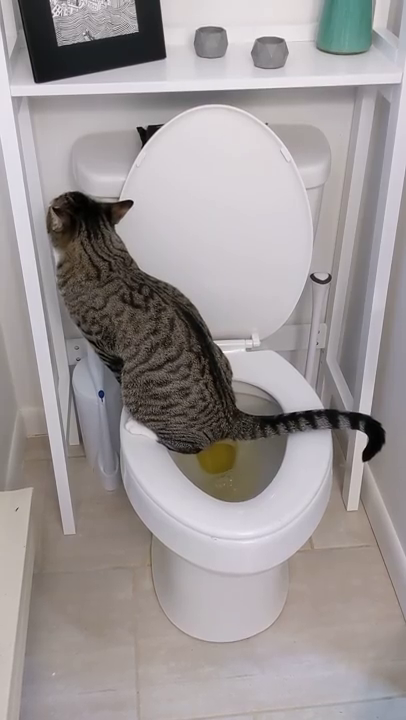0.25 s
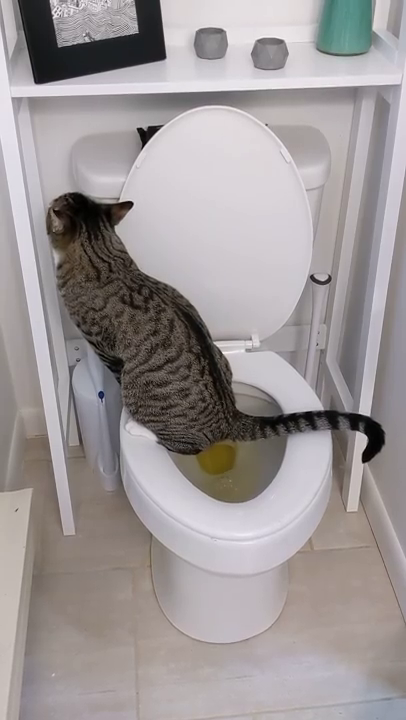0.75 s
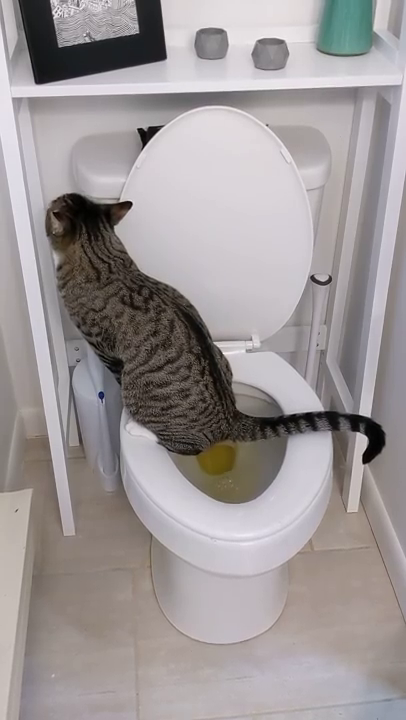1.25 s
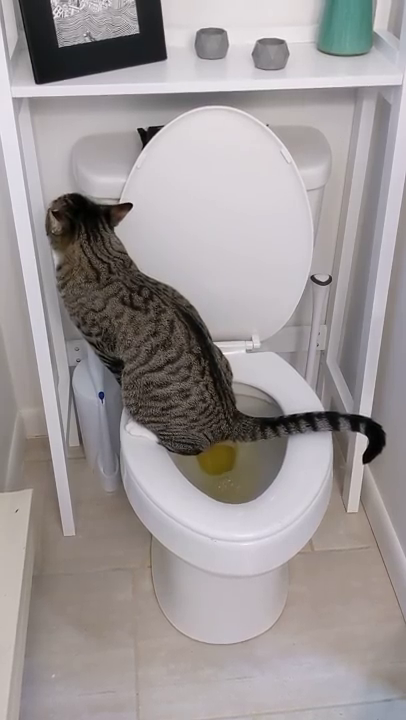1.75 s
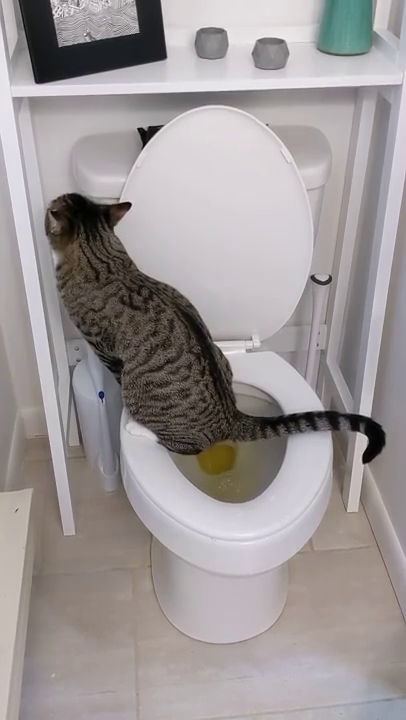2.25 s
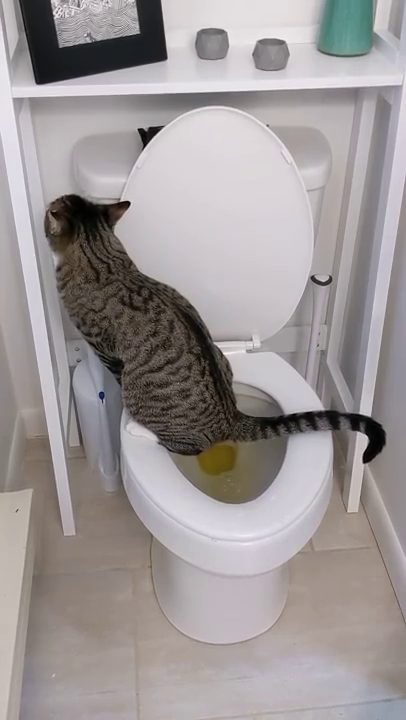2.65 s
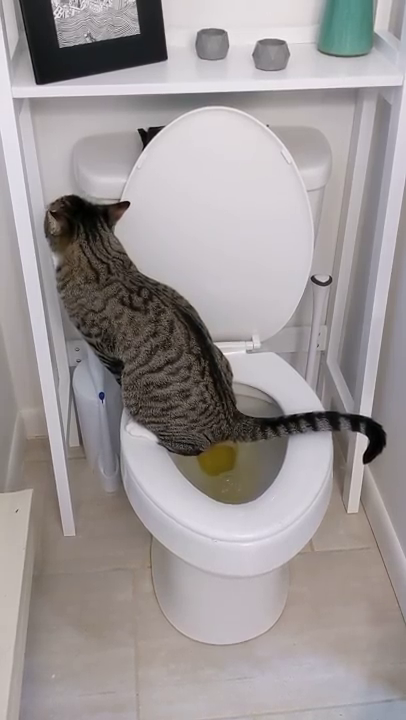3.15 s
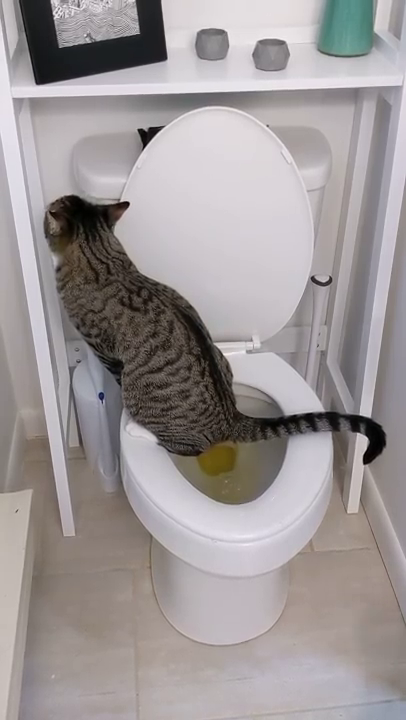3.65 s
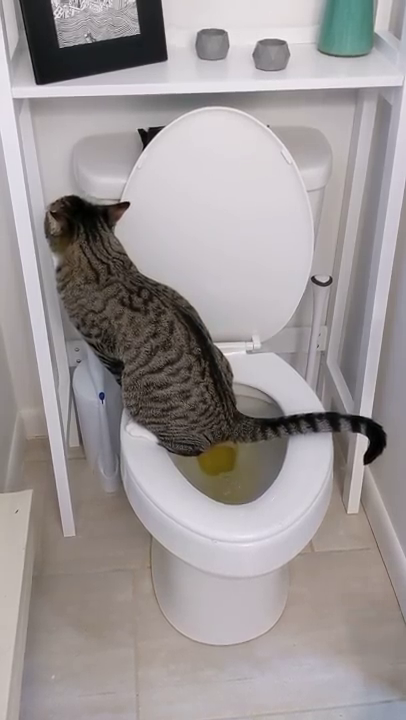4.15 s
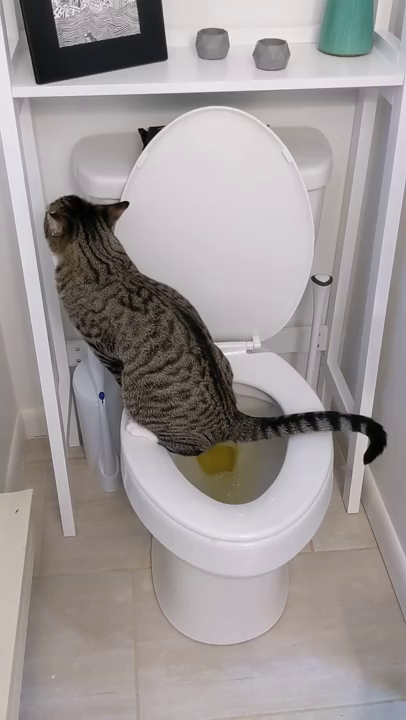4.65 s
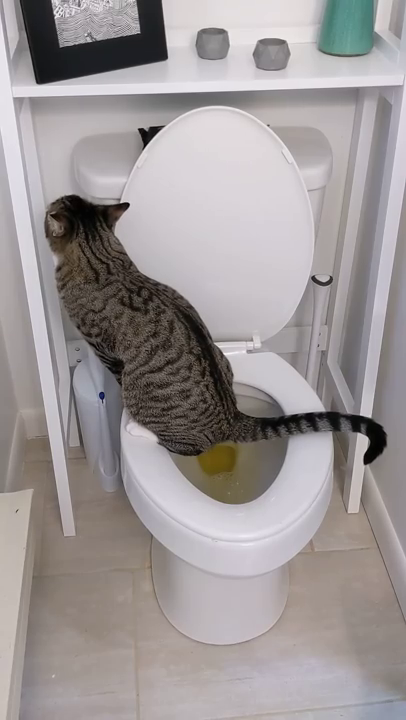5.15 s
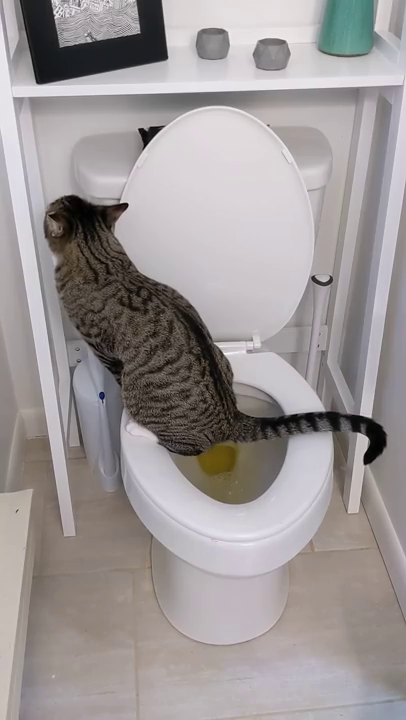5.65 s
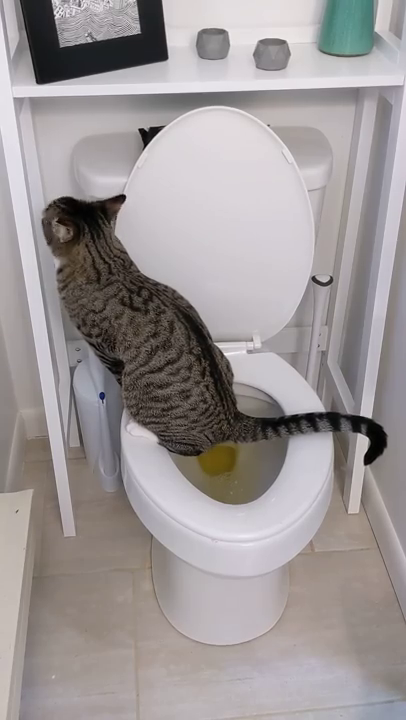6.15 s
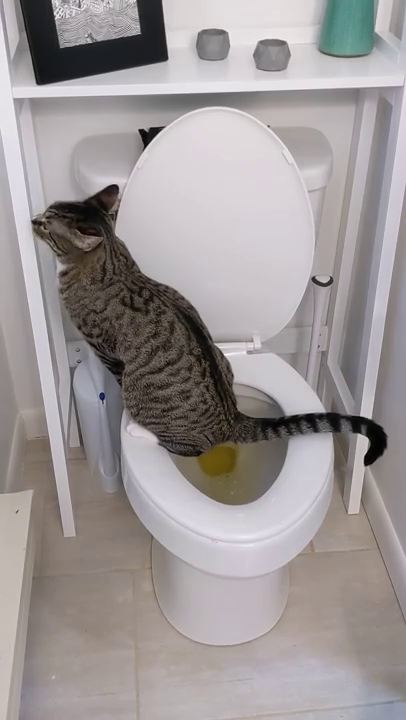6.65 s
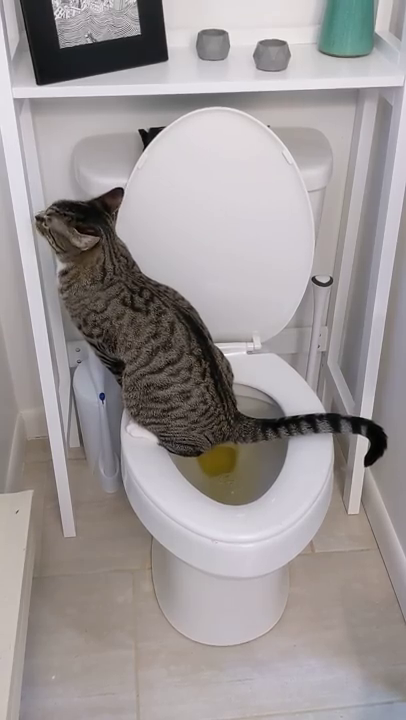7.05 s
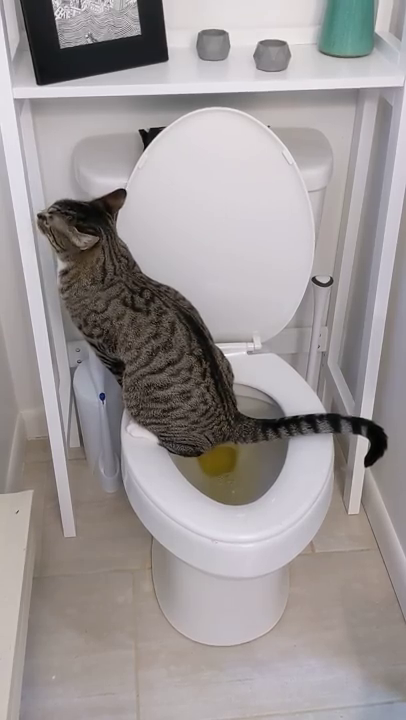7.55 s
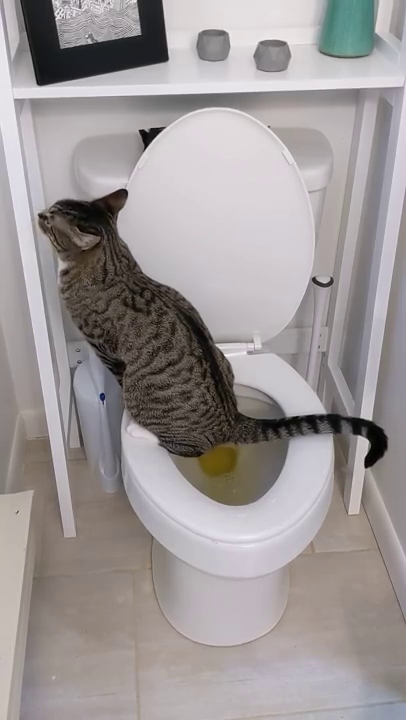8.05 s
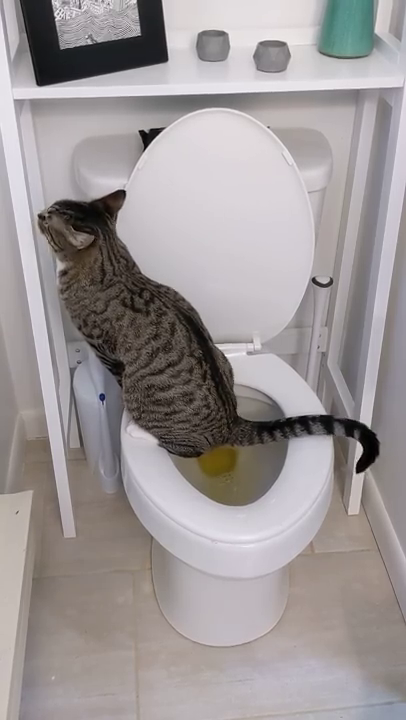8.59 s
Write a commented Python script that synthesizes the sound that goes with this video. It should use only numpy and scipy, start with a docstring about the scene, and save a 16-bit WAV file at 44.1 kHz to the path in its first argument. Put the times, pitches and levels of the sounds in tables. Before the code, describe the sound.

From the start, a cat's thin stream trickles into toilet water, a mix of small gurgles, fine spray and bright plinks. It is heard from nearby, and the bowl and hard bathroom walls give each drop a short ringing tail. The flow runs almost steadily, with brief dips at about 2.6 and 4.1 seconds. At about 4.4 seconds, one soft, low thud comes from somewhere in the house. The stream breaks off around 5.5 seconds, then returns at 6 seconds as short, weaker, slightly higher spurts with scattered drips between them. A last little spurt and a sharp plink come at about 8.3 seconds, and the water stops. Faint, steady air noise and a low, wavering ventilation hum lie underneath throughout and remain alone until the end, near 9 seconds.

```python
"""A small hard-walled bathroom: a cat's thin stream falls into the toilet water, breaks up and stops.
Each drop traps bubbles that ring briefly; large ones gurgle, smaller ones crowd above them in spurts.
Bowl and walls draw every plink out into a tail. Behind it are steady air noise, a low ventilation hum
that wavers in the room's bass modes, and one dull thud from the house."""
import sys
import numpy as np
from scipy import signal
from scipy.fft import rfft, irfft
from scipy.io import wavfile
from scipy.ndimage import uniform_filter1d

SR = 44100
rng = np.random.default_rng(int(sys.argv[2]) if len(sys.argv) > 2 else 0)


def bounce(signal):
    """Save signal as a 16-bit WAV file at the path given by the first command-line argument."""
    frames = np.transpose(np.atleast_2d(signal))
    limited = np.clip(frames, -1, 1)
    pcm = np.round(limited * 32767).astype(np.int16)
    wavfile.write(sys.argv[1], SR, pcm)


N = 389016

# Spurts of the stream. Each row: start and end in seconds, relative levels of gurgle, mid-sized bubbles
# and fine spray in dB, gurgle pitch at start and at end in Hz.
SPURTS = [(-0.1, 0.707, -59.5, -57.5, -56, 1178, 1230), (0.717, 1.748, -55.5, -58, -56, 1217, 1180),
          (1.756, 2.583, -58, -58, -56, 1273, 1260), (2.77, 3.67, -63.5, -57.5, -58, 1323, 1330),
          (3.662, 4.042, -59, -56.5, -57, 1374, 1510), (4.219, 4.7, -56.5, -57, -60, 1305, 1600),
          (4.754, 5.232, -63, -58.5, -60, 1245, 1450), (5.27, 5.44, -91, -63, -53.5, 1300, 920),
          (5.986, 6.12, -66, -69, -68.5, 2280, 2200), (6.148, 6.542, -66, -60.5, -60.5, 1750, 1770),
          (6.536, 6.772, -69, -59, -59.5, 1380, 1650), (7.005, 7.275, -55.5, -63.5, -66.5, 2550, 1840),
          (7.342, 7.52, -73, -82, -63, 1920, 1500), (7.66, 7.877, -72, -75.5, -64.5, 2180, 3900),
          (7.973, 8.26, -62, -64, -67.5, 1520, 2600), (8.25, 8.31, -69, -59, -51.5, 2200, 1600)]


def amp(db):
    """dB to gain."""
    return 10 ** (np.asarray(db) / 20)


def unit_rms(x):
    """Scale to rms 1."""
    return x / np.sqrt(np.mean(x ** 2) + 1e-20)


def at_hz(points, hz):
    """Read a (Hz, value) table on a log axis."""
    knots_hz, values = np.transpose(points)
    return np.interp(np.log(np.maximum(hz, 1)), np.log(knots_hz), values)


def resonance(hz, centre_hz, width_hz):
    """Bell curve of height 1."""
    return 1 / (1 + (2 * (hz - centre_hz) / width_hz) ** 2)


def stereo_noise(gain_at):
    """Noise of rms 1 shaped by gain_at(hz); the channels are alike in the bass."""
    # Each row: frequency in Hz, left-right correlation.
    correlation = [(60, 0.88), (200, 0.99), (380, 0.68), (700, 0.41), (1300, 0.18), (16000, .01)]
    hz = np.fft.rfftfreq(N, 1 / SR)
    mid, side = rfft(rng.standard_normal((2, N)))
    alike = at_hz(correlation, hz)
    spectrum = np.sqrt(1 + alike) * mid + np.sqrt(1 - alike) * side * [[1], [-1]]
    return unit_rms(irfft(spectrum * gain_at(hz), N))


def air(rms_db=-65):
    """Steady air noise, strongest in the bass."""
    # Each row: frequency in Hz, relative density in dB.
    spectrum = [(30, -35), (45, -24), (80, -19), (215, -18), (340, -20), (512, -25.5), (780, -25),
                (900, -31), (2200, -30), (5900, -34), (8080, -37), (10500, -33.5), (13700, -39),
                (16000, -32)]
    return amp(rms_db) * stereo_noise(lambda hz: amp(at_hz(spectrum, hz)))


def ventilation_hum():
    """Rumble picked out by the room's lowest modes, so each tone wavers."""
    # Each row: centre in Hz, width in Hz, rms level in dB.
    modes = [(60.4, 17, -71.5), (142.8, 20, -61), (172, 45, -65.5), (208.3, 13.2, -65), (769, 13, -84.5)]
    return sum(amp(db) * stereo_noise(lambda hz: resonance(hz, centre_hz, width_hz))
               for centre_hz, width_hz, db in modes)


def thud(start_s=4.42, hz=57, t60_s=0.3, rise_s=0.018):
    """A soft blow in the house: slow rise, one low ring."""
    t = np.maximum(np.arange(N) / SR - start_s, 0)
    envelope = amp(-36 - 60 * t / t60_s) * (1 - np.exp(-t / rise_s))
    return envelope * np.sin(2 * np.pi * hz * t)


def bathroom_response(early_db=11, early_s=0.035):
    """Direct sound, dense echoes that die band by band, and the air modes of bowl and room."""
    # Each row: frequency in Hz, echo t60 in seconds.
    tail_t60 = [(900, 0.53), (2400, 0.36), (6300, 0.26), (16000, 0.36)]
    # Each row: frequency in Hz, relative left and right levels in dB, right phase lead in radians.
    modes = [(1043, -5, 15.5, -3), (1105, -8, 14, 0.7), (1207, 2, 11, -0.5), (1213.6, 8, 0.5, 0.4),
             (1326, 8, 14, -2), (1336, 14, 9.5, 0.4), (1358, 1, 14, -0.9), (1440, 1, 11, -4),
             (1642, -16.5, 6.5, -2.1), (1676, -19, 12.5, -0.47), (1748, 0, 18, 0), (1797, 7, 10, -7),
             (2350, 10, 5, 4.5), (2480, 12, 9.5, 8.5), (3570, 22.5, -10, 1), (4140, 23, -9, -9)]
    mode_t60 = [(1100, 0.21), (3500, 0.06)]   # Hz, s
    t = np.arange(SR // 2) / SR
    hz = np.fft.rfftfreq(len(t), 1 / SR)
    noise = rfft(rng.standard_normal((2, len(t))))
    edges_hz = 500 * 2 ** np.arange(0, 6, 0.5)
    response = 0
    for low, high in zip(edges_hz, edges_hz[1:]):
        band = irfft(noise * ((hz >= low) & (hz < high)))
        response += band * amp(-60 * t / at_hz(tail_t60, np.sqrt(low * high)))
    response *= amp(early_db * np.exp(-t / early_s))   # the bowl's echoes come first and fade fast
    for mode_hz, left_db, right_db, lead_rad in modes:
        envelope = amp([[left_db], [right_db]]) * amp(-19.5 - 60 * t / at_hz(mode_t60, mode_hz))
        response += envelope * np.sin(2 * np.pi * mode_hz * t + [[0], [lead_rad]])
    response *= 1 - np.exp(-t / 99e-6)
    response[[0, 1], [0, 2]] += amp(26.5)   # direct sound, 2 samples later on the right
    return response


def place(start_s, sounds, level_db):
    """Mix one sound per row at its start time, with its energy set to its level."""
    gain = amp(level_db) / np.sqrt(np.sum(sounds ** 2, axis=1))
    index = np.round(start_s * SR).astype(int)[:, None] + np.arange(sounds.shape[1])
    return np.bincount(index.ravel(), (sounds * gain[:, None]).ravel(), N)[:N]


def bubbles(start_s, hz, level_db, rise_per_cycle=0.0023, attack_cycles=3.5):
    """Each bubble is a dying sine that rises in pitch as it nears the surface."""
    # Each row: pitch in Hz, cycles to fall by 60 dB.
    decay = [(1200, 48), (2200, 30), (3500, 24), (8000, 24), (15000, 22)]
    life_cycles = at_hz(decay, hz)
    t = np.arange(int(0.7 * SR * np.max(life_cycles / hz))) / SR
    cycles = hz[:, None] * t
    envelope = (1 - np.exp(-cycles / attack_cycles)) * amp(-60 * cycles / life_cycles[:, None])
    ring = np.sin(2 * np.pi * (cycles + rise_per_cycle * cycles ** 2 / 2))
    return place(start_s, envelope * ring, level_db)


def spurt_gains(t, attack_s=0.03, release_s=0.013):
    """One row per spurt: the flow swells, holds and dies away."""
    start_s, end_s = np.transpose(SPURTS)[:2, :, None]
    return np.clip((t - start_s) / attack_s, 0, 1) * np.exp(-np.maximum(t - end_s, 0) / release_s)


def bubble_crowd(surge_sound, clumps_per_s=26, clump_s=0.012, clumped_share=0.6):
    """Mid-sized bubbles and fine spray, partly landing in clumps; spurts and surges set their level."""
    # Each row: lowest and highest pitch in Hz, bubbles per second.
    sizes = [(1445, 3890, 260), (3657, 16670, 380)]
    low_skews, swell_shares = (1.4, 1.01), (0.23, 0.16)   # mid-sized, spray
    clump_count = int(clumps_per_s * N / SR)
    clump_times_s = (np.arange(clump_count) + rng.random(clump_count)) / clumps_per_s
    fast_power, slow_power = (uniform_filter1d(surge_sound ** 2, int(window_s * SR)) + 1e-9
                              for window_s in (0.089, 1 / 3))
    swell_db = np.clip(10 * np.log10(fast_power / slow_power), -12, 12)
    flow = spurt_gains(np.arange(N) / SR)
    levels_db = np.transpose(SPURTS)[3:5]
    crowd = 0
    for (low_hz, high_hz, per_s), db, skew, share in zip(sizes, levels_db, low_skews, swell_shares):
        position, lag, pitch, strength, choice = rng.random((5, int(per_s * N / SR)))
        in_clump_s = clump_times_s[(position * clump_count).astype(int)] - clump_s * np.log(lag)
        start_s = np.where(choice < clumped_share, in_clump_s, position * N / SR)
        hz = low_hz * (high_hz / low_hz) ** pitch ** skew
        strength_db = np.minimum(-2.5 * np.log(strength), 6)   # mostly faint, a few strong
        crowd += unit_rms(bubbles(start_s, hz, strength_db)) * (amp(db) @ flow) * amp(share * swell_db)
    return crowd


def gurgle(per_s=70, pitch_spread=0.042, wander_per_s=14, wander_share=0.08, glug_db=5):
    """A close chain of large bubbles, in glugs; the pitch glides through each spurt and drifts."""
    count = int(per_s * N / SR)
    order = np.arange(count)
    jitter, detune, strength, drift, glug = rng.standard_normal((5, count))
    t = np.maximum((order + 0.4 * jitter) / per_s, 0)
    drift, glug = (np.interp(t * wander_per_s, order, knots) for knots in (drift, glug))
    gains = spurt_gains(t) * amp(np.transpose(SPURTS)[2])[:, None] + 1e-9
    start_s, end_s, *_, first_hz, last_hz = np.array(SPURTS)[gains.argmax(axis=0)].T
    hz = first_hz + (last_hz - first_hz) * np.clip((t - start_s) / (end_s - start_s), 0, 1)
    hz *= (1 + wander_share * drift.clip(-1.2, 2)) * (1 + pitch_spread * detune.clip(-1.5, 2.5))
    level_db = 20 * np.log10(gains.sum(axis=0)) + 2.05 * strength + glug_db * glug
    return bubbles(t, hz, level_db) * np.sqrt(SR / per_s)   # mean level to energy per bubble


def surges(gap_s=0.014, step_db=6, pitch_spread=0.042, satellite_db=-7.5):
    """Runs of four large bubbles that swell to the second and fade; each sheds a smaller one."""
    # Each row: start in seconds, relative level in dB, pitch in Hz.
    runs = [(0.0, -48.5, 1242), (0.159, -53, 1079), (0.428, -44, 1320), (0.52, -51, 1195), (0.8, -53, 1610),
            (0.871, -54.5, 1030), (0.941, -63, 1250), (1.088, -50, 1340), (1.159, -46, 1270),
            (1.238, -43.5, 1162), (1.27, -52.5, 1710), (1.297, -47, 1113), (1.448, -50, 1302),
            (1.5, -48, 1333), (1.59, -55, 1277), (1.897, -45.5, 1428), (2.089, -52.5, 2340),
            (2.109, -57, 1260), (2.18, -52, 1050), (2.225, -46, 1395), (2.485, -51, 1333),
            (2.54, -48.5, 2260), (2.589, -55.5, 1092), (2.92, -49, 1554), (3.501, -51, 1312),
            (3.8, -54, 1345), (3.88, -47.5, 1363), (3.957, -50, 1680), (4.039, -47.5, 1161),
            (4.239, -52, 1600), (4.42, -46, 1285), (4.541, -54.5, 1350), (4.827, -47, 1556),
            (4.738, -58, 1236), (4.886, -60, 1340), (4.922, -56.5, 1100), (5.025, -43.5, 1677),
            (5.117, -50.5, 1330), (5.223, -48, 1265), (5.45, -51, 1173), (6.03, -56.5, 2260),
            (6.092, -51.5, 1860), (6.219, -54.5, 1610), (6.349, -49, 1870), (6.39, -62, 1460),
            (6.708, -53.5, 1520), (7.101, -52.5, 2030), (7.46, -55, 1135), (7.75, -53.5, 2015),
            (7.939, -57.5, 1940), (8.061, -53.5, 1760), (8.098, -54.5, 2020), (8.319, -57, 1210)]
    run_s, run_db, run_hz = np.transpose(runs)[:, :, None]
    order = np.arange(4)
    jitter, detune, strength = rng.standard_normal((3, len(runs), 4))
    start_s = (run_s + gap_s * order * (1 + 0.2 * jitter).clip(0)).ravel()
    hz = (run_hz * (1 + pitch_spread * detune.clip(-1, 2))).ravel()
    level_db = (run_db + 27.5 - step_db * np.abs(order - 0.8) + 2 * strength).ravel()
    satellite_hz = hz * 2 ** rng.uniform(0.39, 1.178, len(hz))
    return bubbles(start_s, hz, level_db) + bubbles(start_s, satellite_hz, level_db + satellite_db)


def drops(spatter_s=0.003, full_spatter_hz=3200, twin_lag_s=0.004, twin_spread=0.06):
    """The clearest plinks: each impact throws a brief noisy spatter and traps two bubbles."""
    # Each row: start in seconds, pitch in Hz, relative level in dB.
    plinks = [(0.002, 10650, -59.5), (0.049, 8500, -59.5), (0.096, 12400, -53), (0.158, 8500, -60),
              (0.214, 8850, -59), (0.254, 10500, -51), (0.313, 7900, -58), (0.407, 6070, -53.5),
              (0.43, 1380, -55.5), (0.44, 13990, -57), (0.453, 4640, -55), (0.485, 3640, -59),
              (0.554, 9760, -50), (0.565, 3680, -59), (0.616, 2520, -60), (0.627, 6900, -55.5),
              (0.785, 4370, -52), (0.875, 7900, -61), (1.129, 6700, -55), (1.165, 9640, -57.5),
              (1.363, 10140, -53), (1.368, 3600, -63), (1.405, 4230, -61.5), (1.453, 11300, -57),
              (1.496, 3570, -59.5), (1.535, 3360, -60.5), (1.587, 6940, -54.5), (1.704, 7850, -41.5),
              (1.75, 13800, -54), (1.766, 5170, -59.5), (1.799, 13300, -56.5), (1.819, 10600, -58),
              (1.841, 3460, -69), (1.938, 10500, -58), (1.962, 13700, -61), (2.023, 12100, -57.5),
              (2.085, 7800, -60), (2.211, 14100, -60), (2.319, 14500, -56), (2.358, 12900, -56.5),
              (2.362, 1397, -53), (2.508, 12500, -55.5), (2.532, 7700, -53), (2.589, 13200, -61),
              (2.737, 7200, -67), (2.766, 3630, -58.5), (2.768, 6200, -62.5), (2.846, 3800, -62),
              (2.866, 6960, -61), (3.037, 5740, -59), (3.072, 1810, -59.5), (3.07, 13400, -60.5),
              (3.149, 3580, -64), (3.24, 12400, -59.5), (3.262, 1380, -51.5), (3.293, 1272, -52.5),
              (3.299, 9200, -57), (3.386, 5230, -58), (3.642, 10450, -57), (3.684, 14100, -59),
              (3.816, 9600, -53), (3.845, 4630, -60), (3.928, 8340, -62.5), (3.997, 9530, -52),
              (4.041, 6400, -60), (4.117, 8000, -63.5), (4.126, 3550, -63), (4.174, 3580, -57),
              (4.171, 12500, -62), (4.189, 6750, -56.5), (4.355, 6440, -65), (4.414, 8650, -55),
              (4.477, 2560, -58.5), (4.527, 5830, -56), (4.565, 4100, -61.5), (4.587, 10800, -56),
              (4.684, 6160, -63.5), (4.694, 13800, -58), (4.748, 12300, -58.5), (4.756, 3660, -63),
              (4.831, 6300, -62.5), (4.955, 11800, -58.5), (4.998, 9070, -64.5), (5.026, 13400, -63),
              (5.059, 1980, -58), (5.19, 14500, -65), (5.238, 9300, -65), (5.272, 9200, -56.5),
              (5.333, 5970, -58), (5.37, 3450, -60.5), (5.399, 10000, -57), (5.44, 1200, -56),
              (5.447, 4440, -52), (5.807, 3370, -57), (5.983, 3030, -60), (5.996, 4400, -56),
              (6.048, 5820, -59), (6.174, 2400, -57.5), (6.26, 2730, -57.5), (6.277, 9800, -61.5),
              (6.421, 12100, -62), (6.485, 2210, -62.5), (6.501, 7900, -61.5), (6.518, 3430, -64.5),
              (6.577, 1382, -57), (6.642, 9600, -63.5), (6.663, 3820, -59.5), (6.681, 10100, -53.5),
              (6.699, 1844, -55.5), (6.794, 6540, -57), (6.887, 13500, -68), (6.912, 4320, -66),
              (6.914, 10100, -62.5), (6.965, 10400, -59), (6.983, 1793, -58), (7.045, 3180, -57.5),
              (7.094, 7300, -69), (7.136, 11900, -66.5), (7.184, 8800, -65.5), (7.255, 13600, -68),
              (7.276, 3400, -64.5), (7.353, 2800, -60.5), (7.386, 1970, -61.5), (7.403, 10300, -59.5),
              (7.427, 7740, -58), (7.441, 7900, -57), (7.448, 1324, -63.5), (7.475, 3540, -57),
              (7.822, 6540, -70), (7.988, 8070, -65.5), (8.023, 3430, -66.5), (8.244, 10300, -63.5),
              (8.252, 7550, -66.5), (8.287, 8730, -57), (8.303, 13000, -59), (8.328, 10000, -43),
              (8.344, 6000, -61)]
    start_s, hz, level_db = np.transpose(plinks)
    t = np.arange(512) / SR
    spatter = rng.standard_normal((len(hz), len(t))) * t * np.exp(-2 * t / spatter_s)
    for i, pitch_hz in enumerate(hz):
        band_hz = [0.77 * pitch_hz, min(1.82 * pitch_hz, SR / 2.2)]
        spatter[i] = signal.lfilter(*signal.butter(2, band_hz, "band", fs=SR), spatter[i])
    size_db = 40 * np.log10(np.minimum(hz / full_spatter_hz, 1))   # larger, lower drops spatter less
    twin_start_s = start_s + rng.uniform(0, twin_lag_s, len(hz))
    twin_hz = hz * (1 + rng.uniform(-twin_spread, twin_spread, len(hz)))
    pair = bubbles(start_s, hz, level_db - 1) + bubbles(twin_start_s, twin_hz, level_db - 6)
    return pair + place(start_s, spatter, level_db - 3 + size_db)


def scene():
    """Water through the room, over air noise, hum and the thud."""
    response = bathroom_response()
    room_gain = np.sqrt(np.sum(response ** 2) / 2)
    surge_sound = surges()
    stream = (gurgle() + surge_sound + bubble_crowd(surge_sound)) / room_gain
    water = signal.fftconvolve((stream + drops())[None], response, axes=1)[:, :N]
    return water + air() + ventilation_hum() + thud()


def record(dry):
    """Two microphones: they hiss, differ in colour, peak in the treble and cut the top."""
    # Each row: frequency in Hz, left minus right in dB.
    balance = [(60, 2.5), (110, -2.5), (200, 1.5), (380, 0), (700, 0), (1290, 3), (2380, 5), (4400, -2),
               (8120, 13), (15000, -5.5)]
    hiss_edge_hz, droop_hz, cutoff_hz = 11500, 14500, 15800
    hiss = amp(-73) * stereo_noise(lambda hz: 1 / np.sqrt(1 + (hiss_edge_hz / np.maximum(hz, 1)) ** 12))
    hz = np.fft.rfftfreq(N, 1 / SR)
    colour_db = at_hz(balance, hz) * [[0.5], [-0.5]]
    colour_db += 3.9 * resonance(hz, centre_hz=13400, width_hz=1300)
    colour_db += np.interp(hz, [droop_hz, cutoff_hz], [0, -4])
    coloured = irfft(rfft(dry + hiss) * amp(colour_db), N)
    return signal.sosfilt(signal.ellip(10, 0.5, 60, cutoff_hz, fs=SR, output="sos"), coloured)


dry = scene()
out = record(dry)
bounce(out)
```